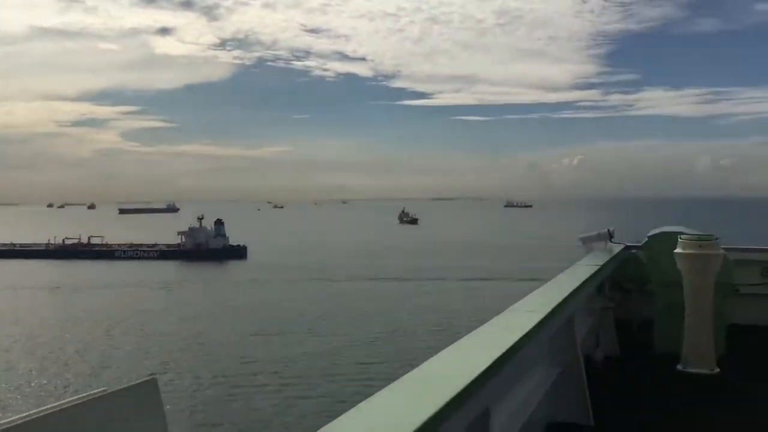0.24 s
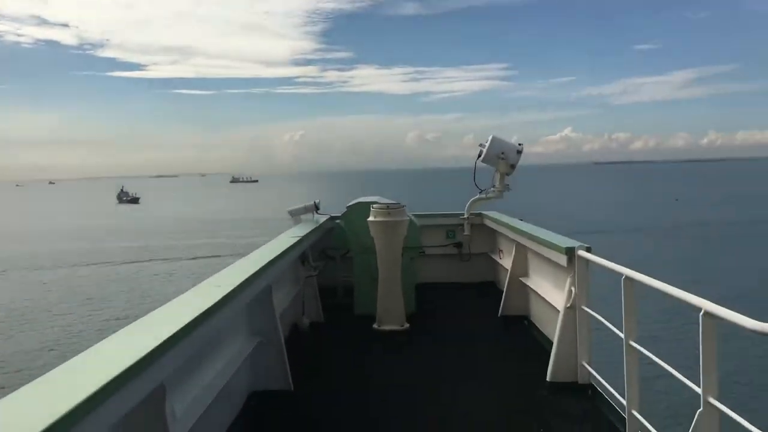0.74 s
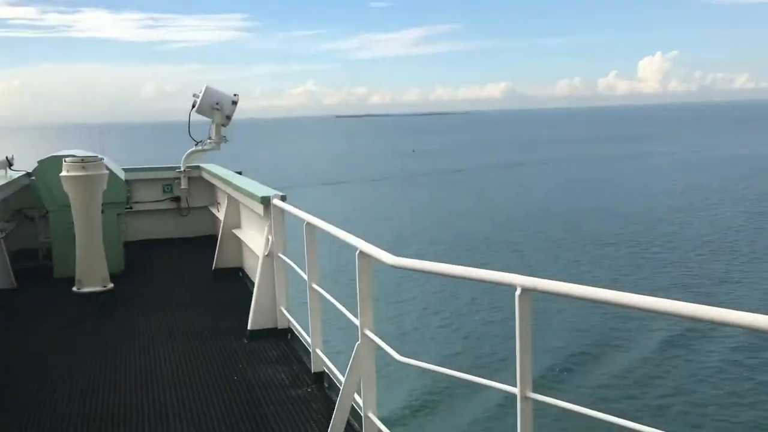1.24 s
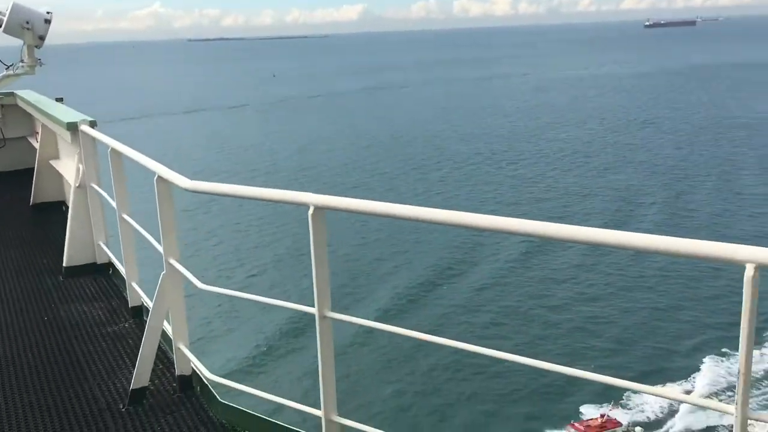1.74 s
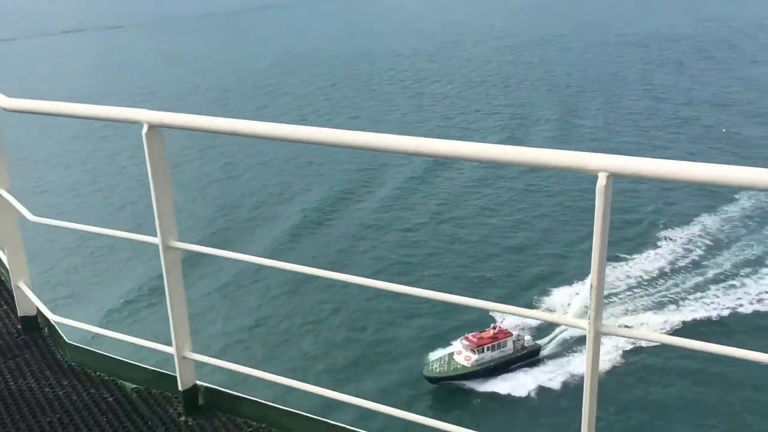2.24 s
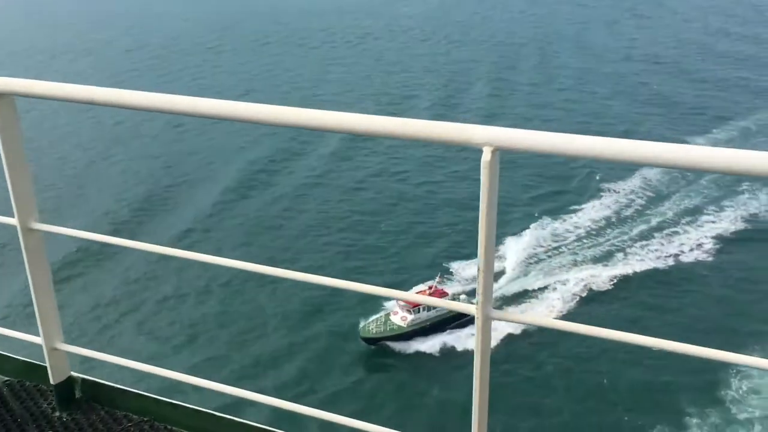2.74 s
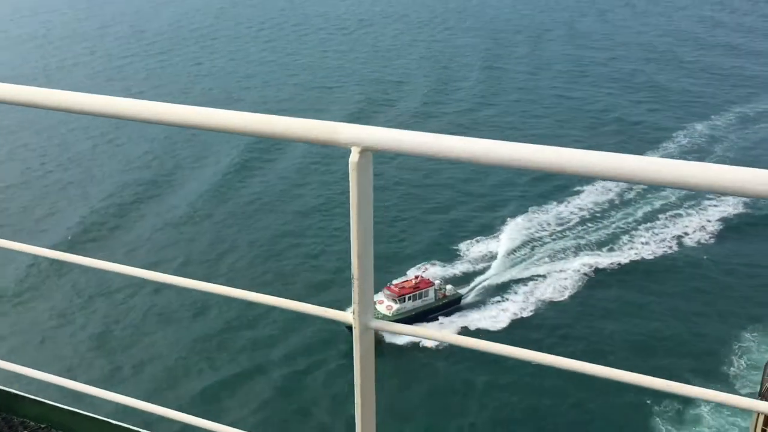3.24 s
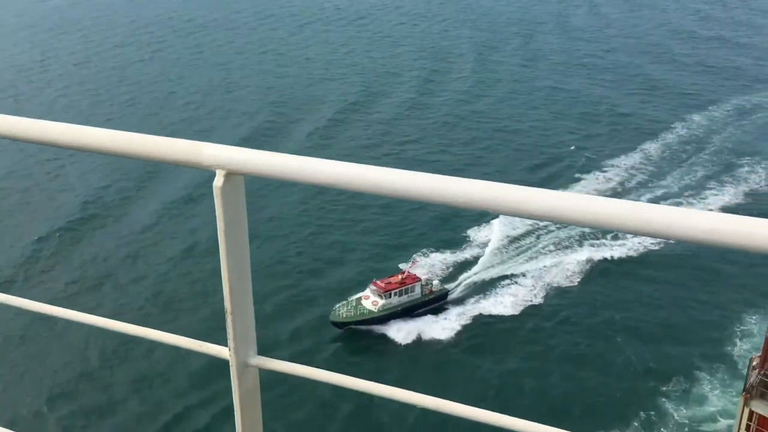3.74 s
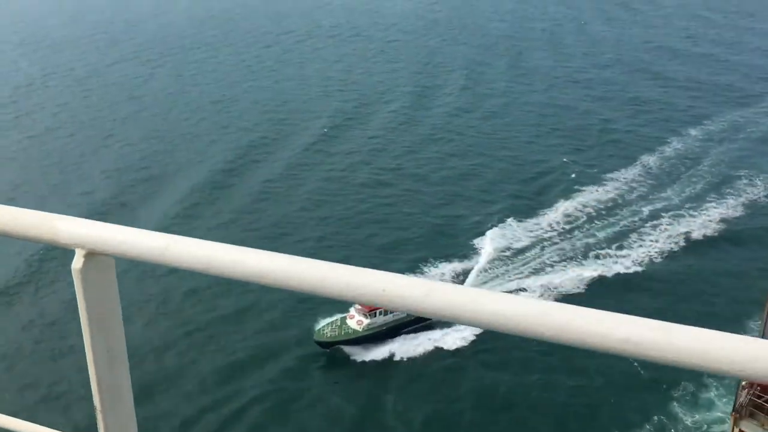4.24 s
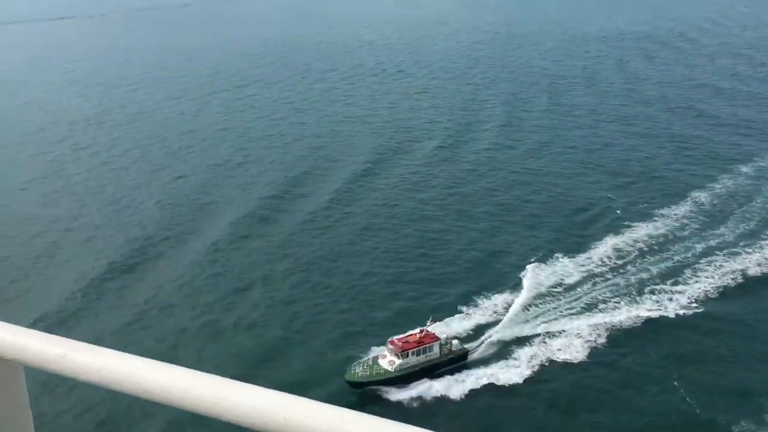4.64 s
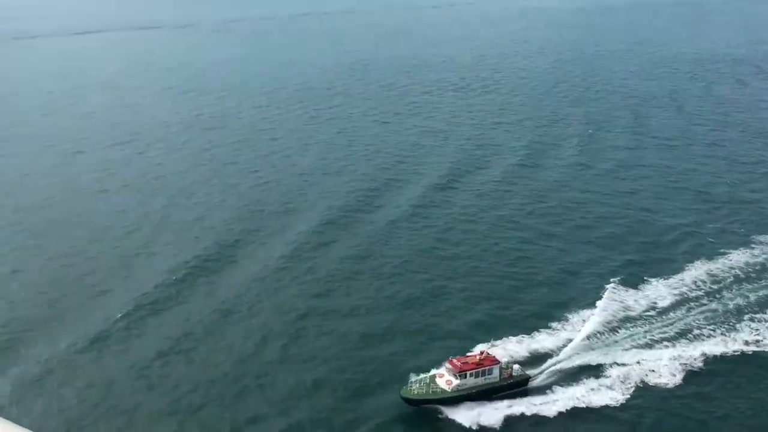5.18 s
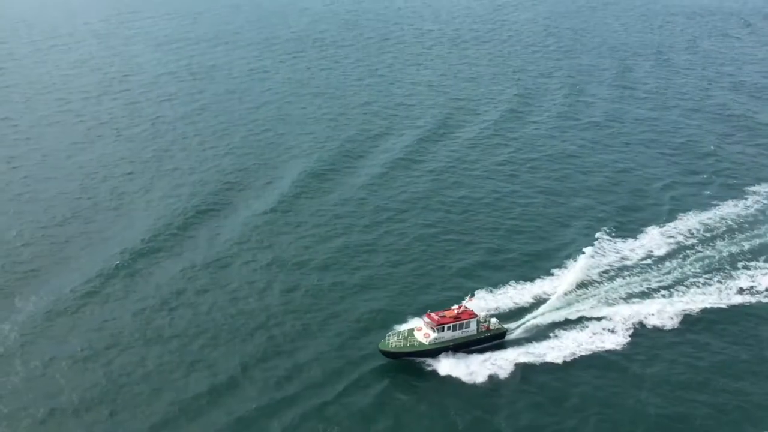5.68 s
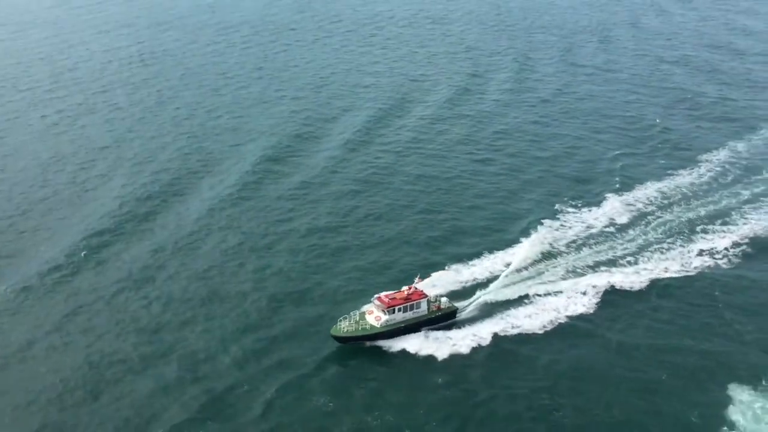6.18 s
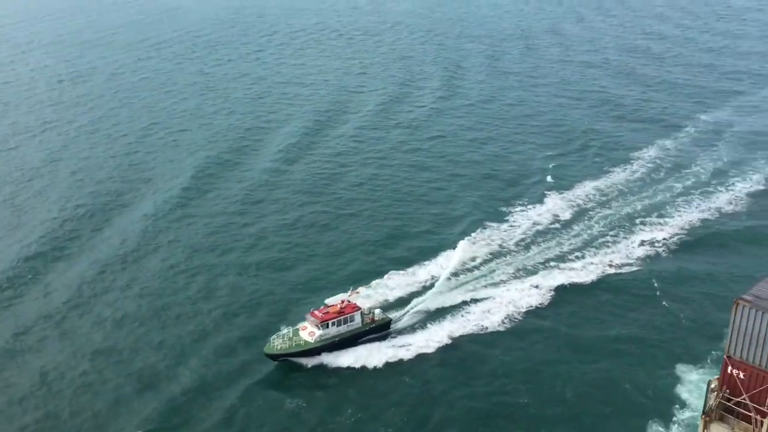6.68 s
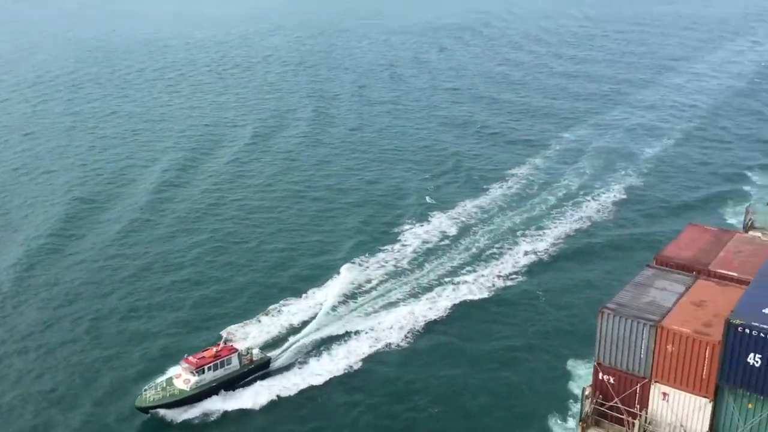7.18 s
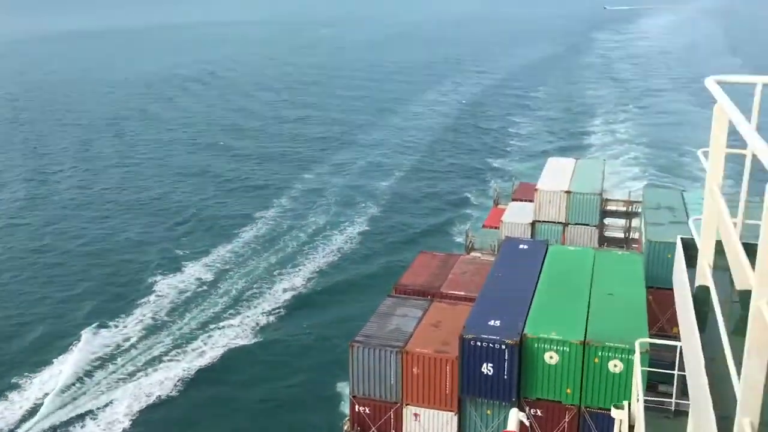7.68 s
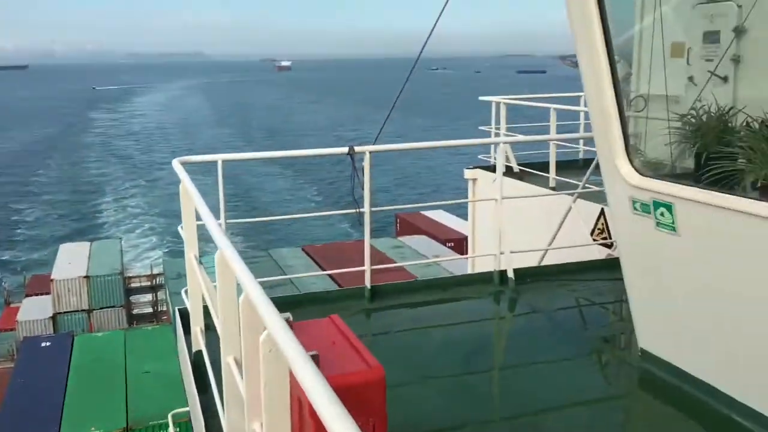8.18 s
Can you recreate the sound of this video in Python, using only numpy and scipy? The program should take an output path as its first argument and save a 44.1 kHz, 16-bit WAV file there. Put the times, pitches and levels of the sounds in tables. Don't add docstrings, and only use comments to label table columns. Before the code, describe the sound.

On the open bridge wing of a cargo ship, a heavy diesel generator throbs continuously in a low, fast pulse. Wind rumbles and flutters against a phone microphone. Beneath, the wake rushes softly along the hull with light hissing spray. A launch's faint turbo whine comes and goes in patches, sliding slowly down in pitch. The engine's tone shifts as the listener turns from bow to side and aft.

```python
import sys
import numpy as np
from scipy import signal
from scipy.fft import rfft, irfft, next_fast_len
from scipy.io import wavfile
from scipy.ndimage import uniform_filter1d

SR = 44100
rng = np.random.default_rng(int(sys.argv[2]) if len(sys.argv) > 2 else 0)


def put_to_file(sound):
    columns = np.atleast_2d(sound).T
    safe = np.clip(columns, -1, 1)
    whole_steps = np.round(safe * 32767)
    wavfile.write(sys.argv[1], SR, whole_steps.astype(np.int16))


def how_loud(loudness_db):
    steps = np.asarray(loudness_db, float) / 20
    return 10 ** steps


N = 371322
TIME = np.arange(N) / SR

# time in seconds, pitch in Hz.
LAUNCH_PITCH = [(0, 1770), (.9, 1700), (2.6, 1565), (3.5, 1497), (4.3, 1430), (5.1, 1390), (5.7, 1365),
                (6.1, 1300), (6.5, 1258), (7, 1235), (8.42, 1180)]
# middle in seconds, level in dB, half length in seconds.
FIRST_TURBO_PATCHES = [(.14, -58.5, .2), (.42, -60, .17), (1.05, -58, .13), (1.3, -58, .2), (1.6, -61, .15),
                       (1.83, -57, .14), (2.3, -56.5, .14), (2.55, -59, .17), (3.2, -56.5, .08),
                       (3.43, -59.5, .08), (4.3, -64, .2), (4.8, -62, .18), (5.7, -63, .15),
                       (6.55, -60, .15), (6.82, -58, .14), (7.6, -64, .3)]
SECOND_TURBO_PATCHES = [
    (.7, -59, 0.1),
    (1.4, -60, .1),
    (2.62, -60, 0.19),
    (5.3, -59, 0.17),
]
GEAR_PATCHES = [
    (.15, -64.5, .3),
    (.75, -65, .25),
    (1.3, -67, .2),
    (1.8, -65, .12),
    (2.6, -64, .1),
]
BLOWER_PATCHES = [(.35, -72, .08), (.45, -63, .04), (.53, -66, .04), (.75, -72, .1), (1.03, -68, .06),
                  (1.2, -77, .15), (1.51, -74, .03), (1.65, -77, .04), (1.9, -75, .04), (2.24, -63, .03),
                  (2.31, -64, .03), (2.38, -58, .04), (2.46, -67, .03), (2.75, -89, .25), (4.45, -77, .25),
                  (4.95, -72, .2), (5.45, -78, .17), (6.5, -78, .3), (7.2, -78, .1), (7.65, -81, .17),
                  (8.42, -80, .2)]
# time in seconds, pitch in Hz.
BLOWER_PITCH = [(0, 7872), (1.1, 7861), (2.4, 7830), (5, 7787), (6.5, 7752), (8.42, 7741)]
# pitch in Hz, width in Hz, level in dB.
VENTS = [
    (2136, 70, -66),
    (7480, 50, -90),
]

# frequency in Hz, level in dB per Hz.
BUFFET_COLOUR = [(14, -20), (30, -11), (40, -4), (55, -1.5), (75, -3.5), (95, -4), (120, -5), (140, -9),
                 (170, -12.5), (210, -16), (230, -21), (270, -20), (350, -25), (450, -31), (700, -48)]
RUSH_COLOUR = [(200, -19), (350, -2.5), (470, -4), (620, -1.5), (840, -4), (1100, -5.5), (1300, -7),
               (1800, -10), (2250, -11), (2750, -21), (3600, -25), (6000, -47.5)]
SPRAY_COLOUR = [(600, -59), (1500, -26), (2500, -4), (3400, -1), (6100, -5), (8000, -12), (10000, -24),
                (15600, -48.5)]
FINE_SPRAY_COLOUR = [(3500, -61.5), (6000, -21), (8000, -2.5), (9500, -1), (11500, -6.5), (13500, -12),
                     (16000, -13)]
# time in seconds, level in dB.
RAIL_NEARNESS = [
    (0, -8.5),
    (.2, -8.5),
    (.75, -2),
    (1.6, -3),
    (2.4, -1),
    (4.8, -0.4),
    (5.6, 1.7),
    (8.42, 1),
]
# middle in seconds, level in dB, half length in seconds.
GUSTS = [(1.1, 4, 0.14), (2.65, 1.2, 0.13), (3.25, 1.5, .12), (3.6, -1, 0.1), (3.9, 1.2, .1),
         (4.17, -1, .07), (5.4, 0.5, 0.16), (6, -1, .12), (6.47, 2, .17), (7, -1, .2), (7.4, 1.5, 0.099),
         (7.65, 1, 0.26), (8.05, 1.3, .1)]
# middle in seconds, level in dB, half length in seconds.
BREAKERS = [
    (.7, -0.3, .3),
    (1.5, 1.8, 0.32),
    (2.65, 2, 0.26),
    (3.3, 1, .22),
    (4.1, 1.3, 0.36),
    (4.9, 0.5, 0.31),
    (5.6, 1.3, 0.31),
    (6.4, -0.1, .2),
    (7.5, 2.5, 0.084),
]
# time in seconds, share from 0 to 1, delay in ms.
WATER_ECHO = [
    (0, .35, 9.3),
    (.7, .4, 9.15),
    (1.8, .5, 8.7),
    (2.6, .6, 8.4),
    (3.2, .4, 8.3),
    (4.5, .25, 8),
    (8.42, .2, 7.5),
]

# pitch in Hz, level in dB.
AFT_MACHINES = [(51.3, -47), (56.9, -46), (70.1, -46), (92.5, -43), (110.5, -47), (116.5, -43),
                (134.4, -45), (141, -51), (161.9, -53), (186, -52), (199, -52), (204, -56), (210, -55)]
# order, level in dB.
WEAK_ORDERS = [(6, -35), (10, -41), (11, -41), (16, -36.5), (18, -38.5), (22, -45), (24, -43.5), (25, -49),
               (26, -52), (28, -52), (29, -51), (30, -51), (32, -43.5), (33, -51), (36, -53), (40, -54),
               (41, -59)]
STRONG_ORDERS = {7: (-24.5, -33), 8: (-26.5, -25.5), 12: (-37.5, -27.5), 13: (-38, -42.5), 14: (-45.5, -35),
                 15: (-24.5, -23), 17: (-44, -37), 19: (-31.5, -41.5), 20: (-37.5, -44.5), 21: (-41, -38)}
STANDING_WAVES = {7: [(2.5, 5, 0.8), (4.2, -2.8, 0.71)], 8: [(3.15, -5.5, 1.2)], 12: [(8.2, -4.5, 0.54)],
                  15: [(3.7, 2, 1)], 20: [(2.7, 17, 1.48), (5.5, -12.5, .5)]}
# middle in seconds, level in dB, half length in seconds.
SHADING = [
    (0, -2, 0.32),
    (2.4, -5, 0.13),
    (2.8, 6.5, 0.25),
    (3.7, -5.5, .6),
]
# time in seconds, then the delay in ms from the deck, the casing and the funnel mouth.
FIRING_ARRIVAL = [
    (0, 65, 62, 57.5),
    (1.8, 63.5, 62.4, 58.2),
    (3.2, 62, 63.5, 60.9),
    (4.6, 60, 63.5, 61.4),
    (6, 60, 63, 61.3),
    (8.42, 61, 64, 62.4),
]
# time in seconds, turn from 0 to 1.
LISTENER_TURN = [
    (0, 0.17),
    (1.2, 0.22),
    (1.9, 0.43),
    (3.1, 1),
    (8.42, 1),
]

# frequency in Hz, width in Hz, depth from 0 to 1.
HOUSING_DIPS = [
    (4910, 550, 0.34),
    (10350, 1000, 0.5),
]


def curves(table):
    seconds, *columns = np.transpose(table)
    return [np.interp(TIME, seconds, column) for column in columns]


def swell(row):
    return np.exp(-((TIME - row[0]) / row[2]) ** 2)


def swells_db(rows):
    return sum(row[1] * swell(row) for row in rows)


def patches(rows, faint_db):
    return np.max([how_loud(row[1]) * swell(row) for row in rows], axis=0) + how_loud(faint_db)


def unit(x):
    return x / np.sqrt(np.mean(x ** 2))


def walk(rate):
    hold = int(SR / rate)
    held = np.repeat(rng.standard_normal(N // hold + 1), hold)
    smooth = uniform_filter1d(uniform_filter1d(held, hold), hold)
    return unit(smooth[:N])


def tone(hz, wobble_hz, rate):
    turns = np.cumsum(hz + wobble_hz * walk(rate)) / SR
    strength = how_loud(2.8 * walk(rate / 2) - 1.2)
    return np.sqrt(2) * np.sin(2 * np.pi * turns) * strength


def turbulence(colour, shared_db, own_db, flicker):
    size = next_fast_len(N)
    octave = np.log2(np.fft.rfftfreq(size, 1 / SR) + 1)
    hz, db = np.transpose(colour)
    shape = how_loud(np.interp(octave, np.log2(hz), db, left=-90, right=-90))
    noise = rfft(rng.standard_normal(size)) * shape
    out, together_db = 0, shared_db * walk(flicker / 2)
    for centre in np.arange(np.log2(hz[0]), np.log2(hz[-1]) + 1, .5):
        window = np.cos(np.pi * np.clip(octave - centre, -.5, .5)) ** 2
        band = irfft(noise * window, size)[:N]
        out = out + band * how_loud(together_db + own_db * walk(flicker))
    return unit(out)


def vents():
    return sum(tone(hz, width_hz / 3, 45) * how_loud(db) for hz, width_hz, db in VENTS)


def blower():
    return tone(curves(BLOWER_PITCH)[0], 8, 50) * patches(BLOWER_PATCHES, -91.5)


def launch():
    hz = curves(LAUNCH_PITCH)[0]
    first = tone(hz, 12, 70) * patches(FIRST_TURBO_PATCHES, -71)
    second = tone(.94 * hz, 10, 70) * patches(SECOND_TURBO_PATCHES, -71)
    gears = tone(1.483 * hz, 12, 70) * patches(GEAR_PATCHES, -80)
    beads_db = 1.5 * walk(40) - 1
    return (first + second + gears) * how_loud(beads_db)


def spray():
    near_db, gust_db = curves(RAIL_NEARNESS)[0], swells_db(GUSTS)
    coarse = turbulence(SPRAY_COLOUR, shared_db=.67, own_db=.37, flicker=15)
    fine = turbulence(FINE_SPRAY_COLOUR, shared_db=0, own_db=0, flicker=12)
    coarse_db = -56 + near_db + gust_db
    fine_db = -68.5 + .38 * TIME + .68 * near_db + 1.3 * gust_db
    return coarse * how_loud(coarse_db) + fine * how_loud(fine_db)


def wake_rush():
    share, echo_ms = curves(WATER_ECHO)
    rush = turbulence(RUSH_COLOUR, shared_db=.3, own_db=.5, flicker=9)
    echo = np.interp(TIME - echo_ms / 1000, TIME, rush)
    rush = (rush + share * echo) / np.sqrt(1 + share ** 2)
    return rush * how_loud(-47 + .3 * curves(RAIL_NEARNESS)[0] + swells_db(BREAKERS))


def wind_buffet():
    lull_db = swells_db([(3.8, -1.8, .8)])
    level_db = -28.6 + .27 * curves(RAIL_NEARNESS)[0] + lull_db
    return turbulence(BUFFET_COLOUR, shared_db=1, own_db=.8, flicker=16) * how_loud(level_db)


def aft_machinery():
    return sum(tone(hz, .15, 1.5) * how_loud(db) for hz, db in AFT_MACHINES)


def slow_cylinders():
    cycles = 2.985 * TIME - .503
    beat = sum(np.cos(2 * np.pi * order * cycles) for order in (15, 25, 29))
    level_db = -53 + 10.5 * curves(LISTENER_TURN)[0] ** 3 + swells_db([(3.5, 7, .8)])
    return np.sqrt(2) * beat * how_loud(level_db)


def generator():
    cycle_hz, plate_lead_s, bulkhead_lag_s = 5.993, .0026, .0035
    deck, casing, mouth = (cycle_hz * (TIME - ms / 1000) for ms in curves(FIRING_ARRIVAL))
    lead = cycle_hz * plate_lead_s
    echo = mouth - cycle_hz * bulkhead_lag_s
    routes = {7: deck + lead, 18: casing + lead,
              **dict.fromkeys((11, 13, 14, 16, 21), echo),
              **dict.fromkeys((6, 8, 30, 32, 33), deck),
              **dict.fromkeys((10, 12, 20, 24, 25), casing),
              **dict.fromkeys((15, 17, 19, 22), mouth)}
    turn = curves(LISTENER_TURN)[0]
    upper_db = -9 + 1.57 * TIME + swells_db(SHADING)
    levels = []
    for order, (bow_db, aft_db) in STRONG_ORDERS.items():
        standing_db = swells_db(STANDING_WAVES.get(order, ()))
        levels.append((order, bow_db + (aft_db - bow_db) * turn + standing_db))
    for order, db in WEAK_ORDERS:
        levels.append((order, db + 2.2 * walk(1.2) + upper_db * (order > 22)))
    out = 0
    for order, db in levels:
        cycles = routes.get(order, casing + rng.random())
        slip = .002 * order * walk(1.5)
        out = out + how_loud(db + .5 * walk(6)) * np.cos(2 * np.pi * (order * cycles + slip))
    return np.sqrt(2) * out


def scene():
    whines = vents() + blower() + launch()
    wind_and_water = spray() + wake_rush() + wind_buffet()
    engines = aft_machinery() + slow_cylinders() + generator()
    return (whines + wind_and_water + engines)[None]


def low_pass(x):
    return signal.sosfilt(signal.butter(12, 15700, fs=SR, output="sos"), x)


def record(dry):
    for hz, width_hz, depth in HOUSING_DIPS:
        peak = signal.iirpeak(hz, hz / width_hz, fs=SR)
        band = signal.lfilter(*peak, dry - dry[:, :1])
        dry = dry - np.clip(depth, 0, 1) * band
    return low_pass(dry)


dry = scene()
out = record(dry)
put_to_file(out)
```